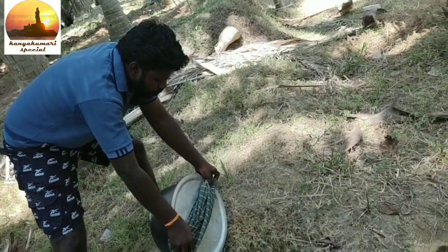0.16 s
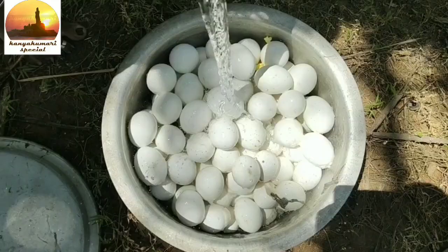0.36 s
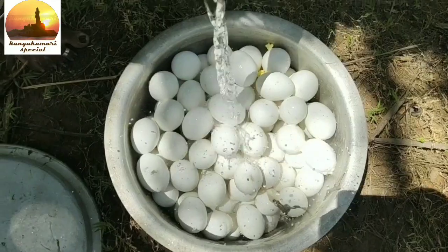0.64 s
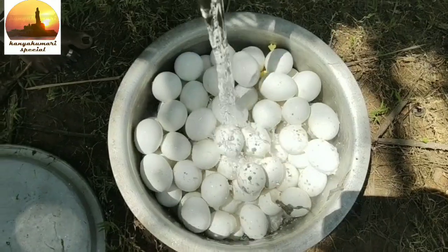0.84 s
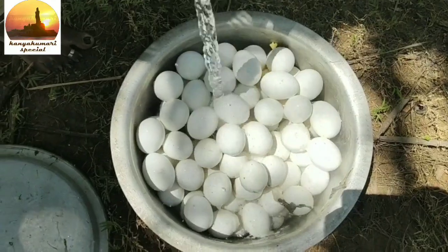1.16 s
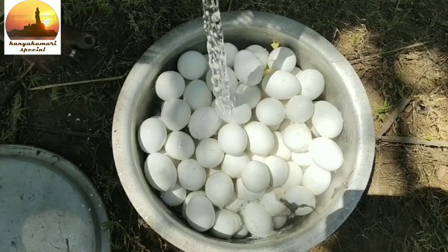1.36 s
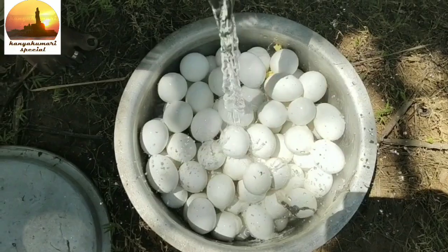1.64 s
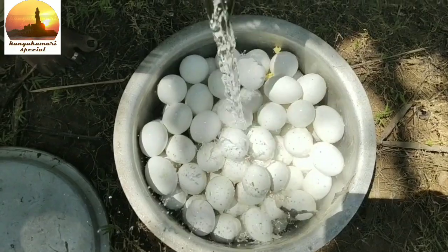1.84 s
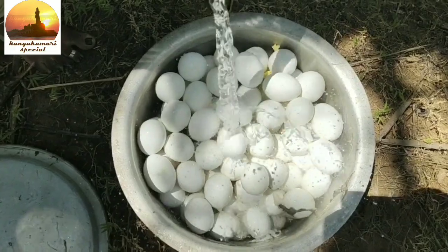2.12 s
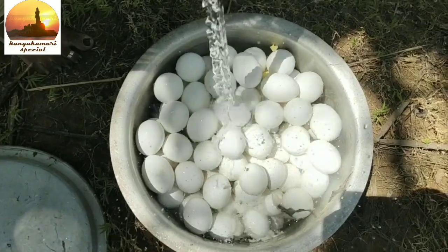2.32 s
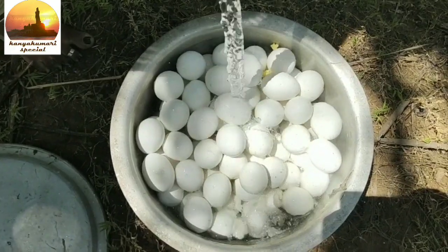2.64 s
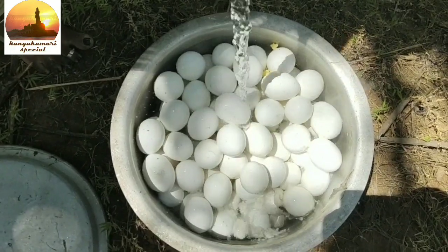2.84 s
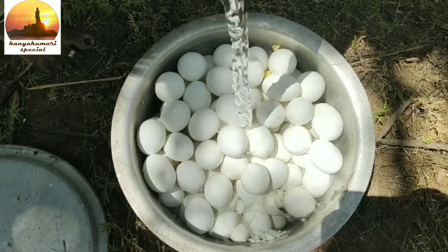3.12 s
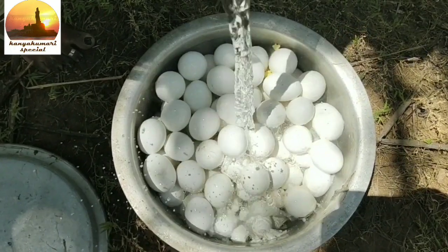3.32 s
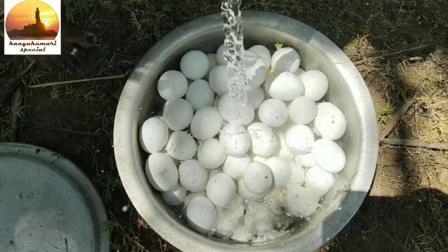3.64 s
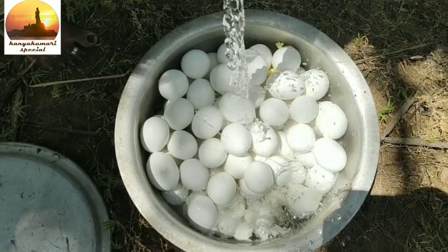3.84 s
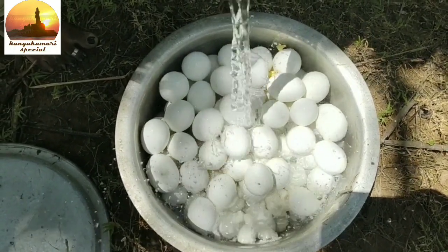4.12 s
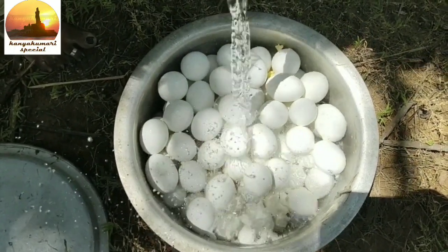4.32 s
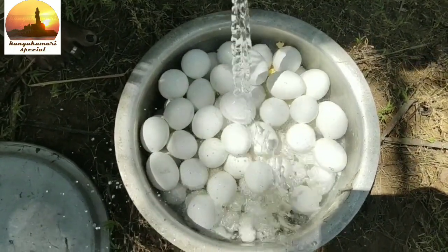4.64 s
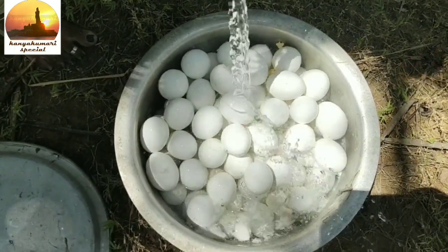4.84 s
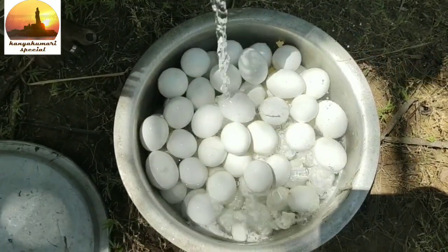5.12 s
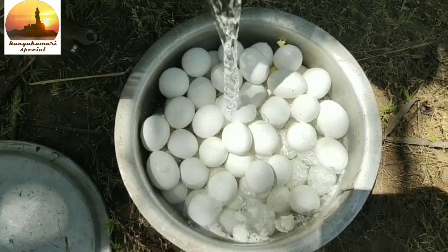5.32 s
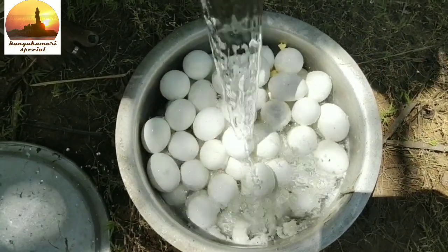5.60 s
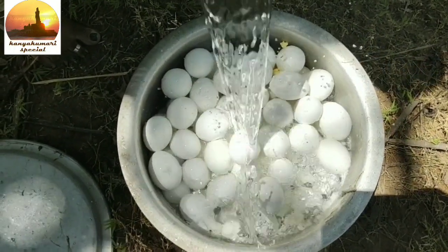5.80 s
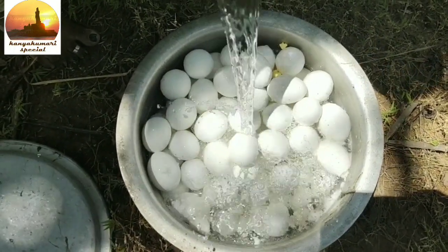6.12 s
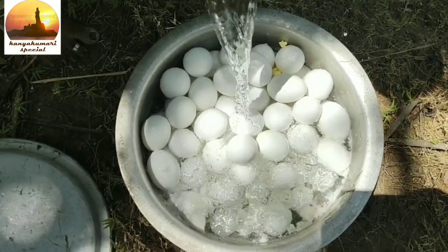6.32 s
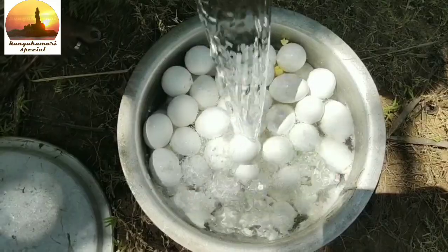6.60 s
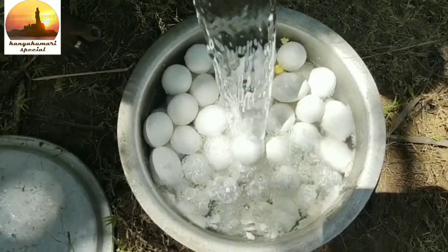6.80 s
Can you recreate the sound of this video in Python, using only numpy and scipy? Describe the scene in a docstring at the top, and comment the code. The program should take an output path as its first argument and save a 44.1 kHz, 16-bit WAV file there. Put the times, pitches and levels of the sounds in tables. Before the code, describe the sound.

Close and outdoors, water falls continuously onto eggshells in a metal pot. It starts suddenly after a moment of silence, bright and spattering with bubbly plops and a low metallic hum. Narrow gaps between eggs ring with gliding tones, and a faint low putter swells past the middle. Gulps and heaving slosh follow as the pool rises. A brief silent break precedes softer, deeper pouring. The stereo image is wide, with very little reverberation.

```python
"""The sound cuts in on water poured onto boiled eggs in a wide metal pot, outdoors and close by.
At once drops spatter on the shells, bubbles fizz, air pockets gurgle and the pot's base drums low.
Loud bubbles, ticks and gulps stand out; then narrow gaps ring, and a low putter swells midway.
As the pot fills, its air resonates and the pool heaves. Near the end the sound drops out once briefly,
then slugs of water thud. Noise through resonators and crowds of decaying sine bubbles make the water."""
import sys
import numpy as np
from scipy import signal
from scipy.io import wavfile
from scipy.ndimage import uniform_filter1d

SR = 44100
rng = np.random.default_rng(int(sys.argv[2]) if len(sys.argv) > 2 else 0)


def wav_out(sig):
    """Save sig, one row per channel (or a flat mono array), as 16-bit PCM at SR to the path in sys.argv[1]."""
    wavfile.write(sys.argv[1], SR, np.round(np.clip(np.atleast_2d(sig).T, -1, 1) * 32767).astype(np.int16))


N = 306936
TIME = np.arange(N) / SR


def gain_of(db):
    """Decibel law: level to amplitude ratio."""
    return 10 ** (np.asarray(db) / 20)


def follow(curve, column=1):
    """Linear interpolation: one column of a control curve, at every sample."""
    rows = np.array(curve)
    return np.interp(TIME, rows[:, 0], rows[:, column])


def wander(rate_hz, count=8):
    """Random modulation: sines of chance phase, slower than rate_hz, sum to an expected RMS of one."""
    t = np.linspace(0, N / SR, 400)
    speed, phase = rng.random((2, count, 1))
    sines = np.sin(2 * np.pi * (rate_hz * speed * t + phase))
    return np.interp(TIME, t, sines.sum(0) * np.sqrt(2 / count))


def steady(x, size=3500):
    """Level normalisation: division by the running RMS of both channels leaves only the grain."""
    power = uniform_filter1d(uniform_filter1d((x ** 2).mean(0), size), size)
    return x / np.sqrt(abs(power) + 1e-12)


def tilt(db):
    """Level difference between ears: gains of left and right when the right is db louder."""
    return gain_of(np.outer([-.5, .5], db))


def colour(x, points, column=1, size=4096):
    """Minimum-phase filtering: the given spectrum, with all ringing after each click."""
    rows = np.array(points)
    hz = abs(np.fft.fftfreq(size, 1 / SR))
    level_db = np.interp(np.log(hz + 1), np.log(rows[:, 0]), rows[:, column])
    log_gain = np.log(gain_of(level_db))
    # the Hilbert transform of the log gain supplies the minimum phase
    taps = np.fft.ifft(np.exp(np.conj(signal.hilbert(log_gain)))).real[:size // 2]
    return signal.oaconvolve(x, taps.reshape((1,) * (x.ndim - 1) + (-1,)), axes=-1)[..., :N]


def resonate(x, hz, width_hz):
    """Resonance by heterodyne: shift hz (fixed or moving) to zero, smooth twice, shift back; peak gain one."""
    turn = np.exp(2j * np.pi * np.cumsum(hz * np.ones(x.shape[-1])) / SR)
    r = np.exp(-np.pi * width_hz / SR)
    slow = signal.lfilter([(1 - r) ** 2], [1, -2 * r, r * r], x * turn.conj() + 1e-18)
    return 2 * (turn * slow).real


def around(x, hz, half_width_hz, order=4):
    """Band-pass by heterodyne: a steep-sided band that follows a moving pitch."""
    turn = np.exp(2j * np.pi * np.cumsum(hz) / SR)
    lowpass = signal.butter(order, half_width_hz, fs=SR, output="sos")
    slow = signal.sosfilt(lowpass, x * turn.conj() + 1e-18)
    return 2 * (turn * slow).real


def focus(crowd, pitch_hz, share, width_hz):
    """Cavity resonance: down between the eggs a share of the crowd rings at the cavity's pitch."""
    enclosed = np.clip(share, 0, 1)
    cavity = steady(resonate(crowd, pitch_hz, width_hz))
    return steady((1 - enclosed) * steady(crowd) + enclosed * cavity)


def drops(per_s, spread_db, wash, size=5):
    """Random impacts: clicks of very unequal size over noise, most a few samples later at left."""
    strength = gain_of(spread_db * np.minimum(rng.exponential(1, N), 3.8)) * rng.choice([-1, 1], N)
    clicks = strength * (rng.random(N) < per_s / SR)
    arrival = (np.arange(N) + rng.integers(-1, size, N)) % N
    pair = np.array([np.bincount(arrival, clicks, N), clicks])
    return pair / pair.std() + wash * rng.standard_normal((2, N))


def bubbles(s, height, hz, cycles, lag, size):
    """Bubble oscillation: each swells and dies, its pitch rising slightly as it nears the surface."""
    place = ((s * SR).astype(int)[:, None] + np.arange(size)).ravel()
    t = np.arange(size) / SR
    out = []
    for delay in (lag, 0 * lag):  # left, then right
        turns = np.maximum(t - delay[:, None], 0) * hz[:, None]
        age = turns / cycles[:, None]  # one at the loudest moment
        envelope = (age * np.exp(1 - age)) ** 3
        ring = envelope * np.sin(2 * np.pi * turns * (1 + 0.018 * (age - 2)))
        out.append(np.bincount(place, (height[:, None] * ring).ravel(), N)[:N])
    return np.array(out)


def swarm(pitch_hz, scatter, cycles, spread_db, lag_s, count, size):
    """Superposition: a crowd of bubbles of random level around the pitch of the moment."""
    when, big, ring, place, sign = rng.random((5, count))
    s = when * N / SR
    hz = np.interp(s, TIME, pitch_hz) * np.exp(scatter * rng.standard_normal(count))
    height = gain_of(spread_db * np.minimum(-np.log(1 - big), 4.5)) * np.sign(sign - .5)
    return bubbles(s, height, hz, cycles * (.5 + ring), lag_s * place, size)


def plops(rows, cycles, size):
    """Bubble oscillation in common mode: big, short bubbles, alike in both channels."""
    s, db, hz = np.transpose(rows)
    return bubbles(s, gain_of(db), hz, np.full(len(s), cycles), 0 * s, size)


def swell(start, length):
    """Envelope: a short linear rise, a hold and an exponential fade."""
    rise_s, fade_s = 0.0087, 0.02
    near = (TIME > start - .1) & (TIME < start + length + .3)
    t = TIME[near] - start
    out = np.zeros(N)
    out[near] = np.clip(t / rise_s + 1, 0, 1) * np.exp(-np.maximum(t - length, 0) / fade_s)
    return out


def swells(rows, rest_db, rest_hz):
    """Power addition: level and pitch of a steady sound whose swells each pull the pitch to their own."""
    power = gain_of(2 * rest_db) * np.ones(N)
    pull = power * rest_hz
    for start, length, db, hz in rows:
        extra = (gain_of(db) * swell(start, length)) ** 2
        power, pull = power + extra, pull + extra * hz
    return np.sqrt(power), pull / power


# force of the stream on the shells: [t/s, spatter level/dB]
STREAM_FORCE = [(0.32, -43), (0.44, -35), (0.85, -34), (0.97, -39.5), (1.07, -35.5), (1.55, -34),
                (1.68, -31), (1.85, -33.5), (1.96, -30), (2.15, -34), (2.42, -42.5), (2.52, -42),
                (2.66, -36), (3.26, -34), (3.46, -41), (3.6, -34), (3.84, -38), (4.15, -38), (4.4, -43),
                (4.68, -43), (4.74, -46.5), (4.78, -38), (4.82, -54), (4.86, -44.5), (4.95, -40.5),
                (5.08, -45.5), (5.38, -34.5), (5.6, -35.5), (5.75, -44), (6.0, -39.5), (6.22, -41),
                (6.46, -39.5), (6.6, -50.5), (6.95, -48.5)]


def force_db():
    """Relative level: how much harder than usual (-36 dB) the stream lands."""
    return follow(STREAM_FORCE) + 36


def chinks(hits, low_hz=4400, high_hz=8400, width_hz=380, count=8):
    """Cavity resonance: chinks between shells ring with the drops; each comes and goes as water covers it."""
    rings = 0
    for hz in np.geomspace(low_hz, high_hz, count):
        open_db = 16.0 * np.clip(wander(rate_hz=8), -2, 1)
        moving_hz = hz * (1 + 0.0091 * wander(rate_hz=12))
        rings = rings + resonate(hits, moving_hz, width_hz) * gain_of(open_db)
    return steady(rings) * tilt(12.0)


# the stream's landing place: [t/s, depth from 0 on bare shells to 1 down between the eggs]
LANDING_DEPTH = [(2.1, 0.25), (2.4, 0.44), (2.65, 0.79), (3.0, 0.44), (3.3, 0.53), (4.2, 0.7), (4.5, 0.66),
                 (5.1, 0.36), (5.8, 0.79), (6.45, 0.72)]
# water standing in the pot: [t/s, extent from 0 hidden under the eggs to 1 an open pool]
POOL_EXTENT = [(2.2, 0.038), (4.3, 0.092), (4.8, 0.44), (5.3, 0.92), (6.9, 0.83)]
# spectrum of the spatter at each microphone port: [f/Hz, left level/dB, right level/dB]
SPATTER_SPECTRUM = [(149, -28, -24), (356, -11.5, -4), (1240, -24.5, -8.5), (2210, -41, 0), (3330, -0.5, 6),
                    (4230, -2.5, 4), (4500, 0, 0.5), (6850, -8.5, 7), (7370, -14.5, 5.5), (8030, 2.5, -3),
                    (9200, -11, -10.5), (10800, -39.5, -9), (15900, -53, -36.5)]
# spectrum of the slap on bare shells: [f/Hz, level/dB]
SLAP_SPECTRUM = [(100, -9.5), (250, -15), (450, -12), (950, 11), (1400, 0), (2100, 12.5), (2700, 15.5),
                 (4000, -27), (9000, -47)]
# slap on bare shells against the spatter: [t/s, relative level/dB]
SLAP_LEVEL = [(0.4, -5.5), (1.7, -4), (2.0, -8), (2.2, 2), (2.45, -11), (2.95, -3.5), (3.15, -8),
              (3.4, -13), (3.65, -7), (4.1, -5), (4.5, 6), (5.0, -20), (5.8, -25), (6.1, -14)]
# whistle of the finest bubbles: [t/s, level relative to the spatter/dB, f/Hz]
BEAD_WHISTLE = [(0.4, -1.5, 7180), (2.1, -1, 7090), (2.45, -3.5, 7030), (2.75, -5.5, 7430), (3.05, 1, 6780),
                (3.4, -3, 6660), (3.6, -1, 7100), (4.2, 2, 6950), (4.6, -1, 7130), (5.05, -3.5, 7160),
                (5.35, -1.5, 6650), (5.62, -5.5, 6400), (5.8, -5.5, 7300), (6.2, -9, 6700),
                (6.9, -1.5, 7030)]
# spectrum of the mist: [f/Hz, level/dB]
MIST_SPECTRUM = [(4000, -61), (8000, 5), (10500, 5.5), (13000, 2.5), (16000, -1)]


def spatter():
    """Impact noise: hard drops on the shells, their slap, a mist, and a whistle of the finest bubbles."""
    hits, sunk = drops(per_s=1700, spread_db=4.0, wash=0.5), follow(LANDING_DEPTH)
    left = colour(hits[0], SPATTER_SPECTRUM, column=1)
    right = colour(hits[1], SPATTER_SPECTRUM, column=2)
    body = steady(np.array([left, right]))
    slap = steady(colour(hits, SLAP_SPECTRUM)) * gain_of(follow(SLAP_LEVEL)) * tilt(1.3)
    bead_hz = follow(BEAD_WHISTLE, column=2) + 130 * wander(rate_hz=5.5)
    beads = swarm(bead_hz, scatter=0.087, cycles=3.84, spread_db=4.0, lag_s=0.00026, count=6000, size=224)
    beads = focus(beads, bead_hz, share=0.34 + 0.091 * sunk, width_hz=800)
    beads = beads * gain_of(follow(BEAD_WHISTLE)) * tilt(12.0)
    haze = hits + 1.0 * rng.standard_normal((2, N))
    mist_db = -5.0 - 4.5 * follow(POOL_EXTENT) + 2.04 * wander(rate_hz=4.5)
    mist = steady(colour(haze, MIST_SPECTRUM)) * gain_of(mist_db) * tilt(2.9)
    shells = gain_of(6.5 - 7.4 * sunk) * body + gain_of(0.5) * sunk ** 2 * chinks(hits)
    flicker_db = (1.86 + follow(POOL_EXTENT)) * wander(rate_hz=17)
    return (shells + slap + beads + mist) * gain_of(follow(STREAM_FORCE) + flicker_db)


# flurries of bubbles, when the stream drags air under: [start t/s, length t/s, level/dB, f/Hz]
BUBBLE_FLURRIES = [(0.424, 0.15, -38.5, 3600), (0.567, 0.092, -28.5, 3290), (0.56, .06, -38.5, 2240),
                   (0.746, 0.098, -32, 3450), (1.352, 0.15, -33.5, 3320), (1.924, 0.28, -33, 3430),
                   (2.048, 0.15, -35, 2850), (2.22, 0.011, -29, 3600), (2.26, 0.068, -31, 3700),
                   (2.333, 0.1, -39, 3750), (2.714, 0.089, -36.5, 3580), (2.798, 0.27, -42.5, 2400),
                   (3.174, 0.3, -34, 3420), (3.523, 0.29, -32.5, 3310), (3.826, 0.12, -36, 3560),
                   (3.965, 0.082, -36, 3100), (4.142, 0.086, -38, 3790), (4.35, 0.26, -36.5, 3160),
                   (4.446, 0.17, -43, 2010), (4.636, 0.069, -42.5, 2990), (4.996, 0.29, -42.5, 2400),
                   (5.269, 0.095, -31, 3880), (5.368, 0.17, -38.5, 4180), (5.52, 0.14, -39.5, 2150),
                   (5.583, 0.1, -38, 3830), (5.75, .02, -34.5, 3180), (5.793, 0.065, -34.5, 3100),
                   (5.968, 0.014, -36, 1950), (5.904, 0.1, -37, 3340), (6.041, 0.13, -35, 3760),
                   (6.138, 0.39, -38.5, 2240), (6.201, 0.054, -32, 3780), (6.43, 0.2, -41.5, 4000),
                   (6.59, 0.066, -35.5, 2320), (6.669, 0.023, -27.5, 2500), (6.704, .13, -33.5, 2220)]
DEEP_BELOW_HZ = 2700  # flurries below this pitch sink deep and ring the pot's air


def fizz():
    """Air entrainment: small bubbles pinched off by the plunging stream, more with its force and in flurries."""
    small = [row for row in BUBBLE_FLURRIES if row[3] >= DEEP_BELOW_HZ]
    rest_db = -42 + 0.78 * force_db() + 2 * follow(POOL_EXTENT)
    level, hz = swells(small, rest_db, rest_hz=3530)
    hz = hz + 50 * wander(rate_hz=9)
    crowd = swarm(hz, scatter=0.11, cycles=3.56, spread_db=3.0, lag_s=.0001, count=5600, size=320)
    crowd = around(crowd, hz, half_width_hz=920)
    crowd = focus(crowd, hz, share=0.73 * follow(LANDING_DEPTH), width_hz=1100)
    return crowd * level * gain_of(0.97 + 1.8 * wander(rate_hz=22)) * tilt(7.3)


# echoes from the eggs and the pot's wall: [delay t/s, gain/1]
NEAR_ECHOES = [(.00062, 0.57), (.00105, -0.69), (.0015, 0.47), (.0021, -0.53), (.0031, .25),
               (.00385, 0.063)]


def in_pot(x, depth=0.9, drift_s=0.00012, oversampling=4):
    """Comb filtering: near echoes band the splash, and the bands drift as the stream wanders."""
    fine = signal.resample_poly(x, oversampling, 1, axis=1)
    sunk, out = depth * follow(LANDING_DEPTH) ** 2, x.copy()
    for delay, gain in NEAR_ECHOES:
        for port in range(2):
            at = (TIME - delay - drift_s * wander(rate_hz=.7)) * SR * oversampling
            out[port] += gain * sunk * fine[port, np.clip(at, 0, N * oversampling - 1).astype(int)]
    return out / np.sqrt(1 + sunk ** 2 * sum(gain ** 2 for _, gain in NEAR_ECHOES))


# edges of the band lost between the eggs: [lower f/Hz, upper f/Hz]
LOST_BAND = (1420, 2450)


def muffled(x, depth=0.6):
    """Band rejection: down between the eggs the splash loses its middle, until the pool opens."""
    band = signal.butter(2, LOST_BAND, "bandpass", fs=SR, output="sos")
    middle = signal.sosfiltfilt(band, x)
    return x - np.clip(depth * follow(LANDING_DEPTH) * (1 - follow(POOL_EXTENT)), 0, 1) * middle


def surge_db():
    """Periodic sloshing: the pool heaves under the stream, more deeply as it opens."""
    crest_s, period_s, depth_db = 5.13, 0.265, 2.5
    return depth_db * follow(POOL_EXTENT) * np.cos(2 * np.pi * (TIME - crest_s) / period_s)


# air pocket dug by the stream between the eggs: [t/s, level/dB, f/Hz, enclosed share from 0 to 1]
AIR_POCKET = [(0.32, -47, 650, 0), (0.42, -35.5, 725, 0.1), (0.84, -46, 737, 0.15), (0.99, -36, 785, 0.2),
              (1.09, -38, 716, .1), (1.17, -50, 815, 0.1), (1.26, -37, 864, 0.04), (1.72, -34, 749, 0.13),
              (2.05, -45.5, 818, 0.52), (2.42, -38.5, 874, 0.63), (2.69, -38, 804, 0.12),
              (3.12, -37.5, 1030, 0.4), (3.3, -57, 926, 0.8), (3.46, -60, 920, 0.2), (3.56, -44, 960, 0.7),
              (3.8, -38.5, 987, 0.74), (4.12, -34.5, 925, 0.68), (4.6, -37.5, 1003, 0.26),
              (4.74, -54, 980, .5), (4.89, -66, 890, 0), (4.93, -38.5, 850, 0.1), (5.03, -33, 788, 0.33),
              (5.13, -34.5, 766, 0.2), (5.24, -37, 820, 0.33), (5.4, -34, 712, 0.28),
              (5.65, -37, 662, 0.41), (6.25, -44.5, 571, 0.2), (6.46, -44, 624, 0.33),
              (6.52, -52, 610, 0.5), (6.6, -68, 630, 0.7), (6.95, -54, 662, 0.8)]
# spectrum of the slosh: [f/Hz, level/dB]
SLOSH_SPECTRUM = [(120, -9.5), (250, -9.5), (370, -17), (500, -1.5), (640, 0), (850, -11.5), (1500, -9.5),
                  (4000, -82)]


def gurgle():
    """Cavity collapse: large air pockets between the eggs, over a slosh that grows with the stream."""
    hz = follow(AIR_POCKET, column=2) * (1 + 0.019 * wander(rate_hz=9))
    enclosed = follow(AIR_POCKET, column=3)
    crowd = swarm(hz, scatter=0.2515, cycles=2.75, spread_db=0.1, lag_s=0.0001, count=3000, size=640)
    crowd = around(crowd, hz, half_width_hz=306)
    crowd = signal.sosfilt(signal.butter(6, 490, "highpass", fs=SR, output="sos"), crowd)
    bubbling_db = 1.4 * (1 - enclosed) * wander(rate_hz=14)  # an enclosed pocket gurgles more evenly
    pockets = focus(crowd, hz, share=0.97 * enclosed, width_hz=174)
    pockets = pockets * gain_of(follow(AIR_POCKET) - 1.5) * tilt(0.82)
    slosh = steady(colour(drops(per_s=900, spread_db=4.5, wash=0.13), SLOSH_SPECTRUM))
    widening_db = np.interp(TIME, [5.4, 5.95], [0, 5.5])  # the stream widens
    slosh_db = -49.5 + 0.62 * force_db() + widening_db + 0.6 * surge_db()
    return (pockets + slosh * gain_of(slosh_db) * tilt(1.4)) * gain_of(surge_db() + bubbling_db)


# air resonances of the full pot: [f/Hz, width f/Hz, level/dB]
POT_AIR_MODES = [(1536, 130, -5), (2035, 290, 8), (2487, 430, 4.5)]
# shifting tuning of the pot's air: [t/s, pitch relative to the full pot/1]
AIR_TUNING = [(4.6, 0.9), (5.05, 1.02), (5.5, 1.04), (5.9, 0.94), (6.45, 1.03), (6.65, 1.02)]


def hollow():
    """Air-column resonance: deep bubbles ring the pot's air, louder as the pool grows, around a lower rest pitch."""
    deep = [row for row in BUBBLE_FLURRIES if row[3] < DEEP_BELOW_HZ]
    pool = follow(POOL_EXTENT)
    rest_db = -54.5 + 15 * pool + 0.58 * force_db()
    level, hz = swells(deep, rest_db, rest_hz=2550 - 450 * pool)
    crowd = swarm(hz, scatter=0.092, cycles=2.5, spread_db=2.0, lag_s=0.00016, count=5000, size=384)
    air = 0
    for mode_hz, width_hz, db in POT_AIR_MODES:
        air = air + gain_of(db) * resonate(crowd, mode_hz * follow(AIR_TUNING), width_hz)
    return steady(0.76 * crowd + pool * air) * level * gain_of(1.0 * wander(rate_hz=14)) * tilt(0.53)


# spectrum of the rumble: [f/Hz, level/dB]
RUMBLE_SPECTRUM = [(15, -10), (35, -34), (60, -6), (80, 0), (110, 1), (135, -3), (180, -10.5), (300, -22),
                   (700, -38)]
# low rumble: [t/s, level/dB]
RUMBLE_LEVEL = [(0.32, -47.5), (0.6, -42), (1.62, -46.5), (1.9, -59), (3.6, -60.5), (4.0, -56.5),
                (5.2, -58), (6.05, -58), (6.45, -46.5), (6.95, -48.5)]
# hum of the pot's base, until water covers it: [t/s, level/dB]
HUM_LEVEL = [(0.32, -50), (0.5, -44), (1.2, -40), (1.68, -45), (1.9, -58.5), (2.48, -56), (2.65, -69.5)]
# upper drone of the pot: [t/s, level/dB]
DRONE_LEVEL = [(0.32, -58), (1.6, -48.5), (1.9, -54), (2.9, -65.5), (6.9, -57.5)]


def drumming():
    """Forced vibration: the stream's weight drums a rumble, a wavering hum and a drone from the pot's base."""
    def push(apart):
        """Partial coherence: noise shared by both channels, plus a part of their own."""
        return rng.standard_normal(N) + apart * rng.standard_normal((2, N))
    rumble = steady(colour(push(0.85), RUMBLE_SPECTRUM), size=9000) * gain_of(follow(RUMBLE_LEVEL) + 3.0)
    hum_hz = np.interp(TIME, [.4, 2.4], [151.5, 156]) + 0.9 * wander(rate_hz=5.4)
    hum = np.sqrt(2) * np.sin(2 * np.pi * np.cumsum(hum_hz) / SR)
    hum = hum * gain_of(follow(HUM_LEVEL) + 0.95 * wander(rate_hz=9.6))
    knocks = push(0.25)
    drone = resonate(knocks, 192, width_hz=28) + gain_of(-10.0) * resonate(knocks, 276.0, width_hz=65)
    return rumble + hum + steady(drone) * gain_of(follow(DRONE_LEVEL) - 3.0)


# single loud bubbles: [t/s, level/dB, f/Hz, left minus right level/dB]
LOUD_BUBBLES = [(0.432, -20, 4400, -13), (0.4445, -13, 7030, -7), (0.4839, -16, 6890, -11),
                (0.5712, -9, 3320, -4.5), (0.5874, -12.5, 2730, -5.5), (0.6341, -13.5, 3250, -3),
                (0.7533, -14.5, 3480, -6.5), (0.7812, -18, 7400, -6.5), (0.8022, -26, 3000, -7.5),
                (0.8202, -7, 3010, -8), (0.8344, -17, 3130, -9), (0.8516, -10.5, 7420, -15),
                (0.8715, -12, 3460, -15), (0.8784, -13, 3300, -6.5), (1.0846, -13.5, 8000, -4),
                (1.1513, -19, 7600, -6.0), (1.4168, -15, 4000, -4), (1.6458, -16, 7440, -12),
                (1.6584, -11, 7000, -17), (1.6744, -17, 6850, -8), (1.7012, -12.5, 7450, -8.0),
                (1.8279, -14.5, 7300, -7.5), (1.9511, -11.5, 6500, -15.5), (1.9606, -12, 3500, -8.0),
                (1.9804, -14, 3780, -7), (1.9874, -10.5, 3670, -6), (2.0768, -13.5, 7100, -14),
                (2.1412, -22, 3720, -6.0), (2.219, -7.5, 3480, -7), (2.2254, -12, 3400, -9.0),
                (2.6484, -15.5, 6440, -12), (2.7293, -17, 3760, -6), (3.0959, -13, 6600, -12),
                (3.1238, -19, 7110, -18), (3.1708, -17, 3650, -6.5), (3.2017, -13, 3580, -5),
                (3.261, -13, 7080, -14), (3.4551, -16, 3340, -3), (3.498, -16.5, 3180, -7.5),
                (3.5419, -11.5, 3220, -6.5), (3.5713, -15, 3320, -8.5), (3.6332, -15, 3370, -8.0),
                (3.6417, -11, 3450, -9.0), (3.6474, -12.5, 3330, -6.0), (3.9669, -15, 3160, -9.0),
                (4.0727, -15.5, 7000, -19), (4.3556, -16.5, 3200, -3), (4.4788, -18, 3330, -7.0),
                (4.6693, -20, 3100, -2), (4.7691, -27, 2970, -6), (5.2929, -13.5, 3810, -7.0),
                (5.3862, -11.5, 6640, -19), (5.6211, -19, 2130, 0), (5.7629, -18, 3320, -8.0),
                (5.8162, -17, 3000, -12), (6.2462, -17, 3750, -4), (6.6623, -34, 2580, -7),
                (6.7471, -20, 2070, -1.0), (6.8394, -20.5, 2050, 5), (6.8504, -30, 5920, -9),
                (6.8698, -22, 4040, -9)]


def plips():
    """Bubble oscillation: the few that stand out of the crowd, each from its own side."""
    s, db, hz, pan_db = np.transpose(LOUD_BUBBLES)
    cycles, sides = np.clip(hz * 0.0011, 1.2, 5), tilt(-pan_db)
    heights = gain_of(db) * sides / sides.mean(0)
    return np.array([bubbles(s, height, hz, cycles, 0 * s, size=512)[0] for height in heights])


# sharp drops striking shells and rim: [t/s, relative level/dB]
SHARP_DROPS = [(0.4455, -2), (0.572, -5), (0.7822, -3), (0.8525, -4), (0.898, -1.5), (1.21, -17),
               (1.418, 2), (1.72, -17), (1.952, 1), (2.22, -14), (2.5272, -11), (2.73, -2), (3.263, 0),
               (3.5912, -14), (4.074, -21), (4.115, -5), (4.357, -13), (4.77, -12), (5.3867, -10)]


def ticks():
    """Impulse excitation: stray drops snap on the shells and the rim as very short noise bursts."""
    clicks = np.zeros(N)
    for s, db in SHARP_DROPS:
        clicks[round(s * SR)] = gain_of(db - 6.0)
    t = np.arange(384) / SR
    snap = rng.standard_normal((2, len(t))) * np.exp(-t / 0.00045)
    snaps = signal.oaconvolve(clicks[None], snap, axes=1)[:, :N]
    return 0.2 * colour(snaps, MIST_SPECTRUM) + 0.8 * colour(snaps, SPATTER_SPECTRUM, column=2) * tilt(6.4)


# large pockets of air bursting: [t/s, level/dB, f/Hz]
BURSTING_POCKETS = [(1.101, -29, 590), (1.516, -24, 762), (1.631, -22, 766), (2.445, -23.5, 870),
                    (2.536, -29, 785), (3.135, -23.5, 990), (3.876, -26, 960), (4.196, -39, 904),
                    (4.272, -23, 912), (4.925, -17.5, 830), (5.067, -36, 835), (5.119, -17, 790),
                    (5.384, -22.5, 676), (5.424, -30, 697), (5.468, -38, 740), (5.538, -26, 644),
                    (5.643, -28, 638), (5.663, -33, 646), (5.68, -27, 665), (5.908, -26, 624)]


def gulps():
    """Large-bubble oscillation: bursting air pockets ring low and briefly."""
    return plops(BURSTING_POCKETS, cycles=1.9, size=1024)


# water running through narrow gaps: [start t/s, length t/s, level/dB, first f/Hz, last f/Hz]
NARROW_GAPS = [(2.162, 1.03, -41.5, 1220, 1200), (2.298, 0.32, -49, 1810, 1830),
               (2.31, 0.47, -46, 2770, 2800), (2.52, 0.65, -46.5, 1470, 1440),
               (3.15, 0.45, -50, 2800, 2730), (3.257, 1.25, -43.5, 1265, 1255),
               (3.308, 0.31, -48.5, 1640, 1600), (3.843, 0.13, -46.5, 1650, 1670),
               (4.26, .38, -41, 2740, 2760), (4.32, 0.25, -45.5, 1640, 1710),
               (4.337, 0.31, -47, 4640, 4450), (4.656, 0.09, -40, 3100, 3010),
               (4.91, 0.05, -42, 1150, 1060), (4.95, 0.34, -41, 940, 893), (4.972, 0.25, -40, 3200, 3320),
               (5.26, 0.31, -45.5, 1560, 1540), (5.95, 0.031, -45, 1200, 1240),
               (6.1, 0.38, -45.5, 1590, 1540), (6.013, 0.21, -41, 3420, 3770),
               (6.435, 0.025, -39.5, 2940, 2950), (6.779, 0.04, -43.5, 940, 920),
               (2.247, .1, -41, 4350, 4300), (2.5, 0.49, -45, 8420, 8600), (2.36, 0.28, -44, 3650, 3780),
               (2.556, 0.21, -36, 7300, 7140), (2.993, 0.47, -43.5, 4200, 4340),
               (3.0, 1.56, -52.5, 5200, 5300), (4.357, 0.1, -38.5, 4130, 4050),
               (4.893, 0.41, -46, 4520, 4560), (4.996, 0.29, -41, 2800, 2600),
               (5.208, 0.41, -47.5, 5560, 5720), (5.54, 0.51, -44.5, 2110, 1940),
               (6.658, .16, -44, 2130, 2010)]


def gaps():
    """Cavity resonance: running water rings the air in narrow gaps, each at its own gliding pitch."""
    trickle, out = drops(per_s=1200, spread_db=4.5, wash=0.46), np.zeros((2, N))
    for start, length, db, first_hz, last_hz in NARROW_GAPS:
        shape = swell(start, length)
        live = shape > .01
        hz = np.interp(TIME[live], [start, start + length], [first_hz, last_hz])
        width_hz = 104 + 0.043 * first_hz  # higher gaps resonate more broadly
        ring = steady(resonate(trickle[:, live], hz, width_hz))
        out[:, live] += ring * shape[live] * gain_of(db) * tilt(3.8 * np.log2(first_hz / 1000))
    return out * gain_of(2.8 * wander(rate_hz=6.2))


# levels of the putter: [t/s, thump level/dB, lower ring level/dB, upper ring level/dB]
PUTTER_LEVELS = [(3.6, -66, -67, -66), (4.03, -52.5, -63, -54.5), (4.3, -63, -58, -56),
                 (4.55, -58.5, -50.5, -58.5), (4.8, -46, -52, -55.5), (5.0, -51.5, -51.5, -60),
                 (5.3, -63.5, -67, -64.5), (5.6, -76, -77, -84)]
# what each beat rings, thump first: [f/Hz, width f/Hz]
PUTTER_MODES = [(93, 56), (190, 36), (250, 34)]


def putter():
    """Periodic excitation: near-even beats, perhaps a pump's engine, each a thump and two soft rings."""
    period_s, beat_s = 0.0567, 4.811
    count = np.floor((TIME - beat_s + 0.00088 * wander(rate_hz=6)) / period_s)
    beats = np.diff(count, prepend=count[0]) * gain_of(2.2 * wander(rate_hz=10))
    out = 0
    for column, (hz, width_hz) in enumerate(PUTTER_MODES, 1):
        ring = resonate(beats, hz, width_hz)
        out = out + ring / ring.std() * gain_of(follow(PUTTER_LEVELS, column))
    return out


# slugs of the wide stream landing in the pool: [t/s, level/dB, f/Hz]
WATER_SLUGS = [(6.435, -34, 95), (6.477, -34, 120), (6.505, -37, 85), (6.553, -35, 125), (6.597, -34, 108),
               (6.627, -39, 101), (6.738, -31.5, 104), (6.934, -36, 100)]


def thuds():
    """Low-frequency impact: slugs of the wide stream thud into the pool as short, deep pulses."""
    return plops(WATER_SLUGS, cycles=1.0, size=3000)


def walls(x, t60=0.06, size=3000):
    """Reverberation: quick scattered reflections from the eggs and the ground decay exponentially."""
    t = np.arange(size) / SR
    sparse = rng.standard_normal((2, size)) * (rng.random((2, size)) < .12)
    taps = sparse * gain_of(-60 * t / t60) * (t > .003)
    taps /= np.linalg.norm(taps, axis=1, keepdims=True)
    return signal.oaconvolve(x, taps, axes=1)[:, :N]


def scene():
    """Superposition: all the water sounds with their reflections, the pot beneath, and the putter."""
    side_db = np.interp(TIME, [4.0, 5.2], [.3, -1.8])  # the splash's balance shifts left as the pot fills
    splash = muffled(in_pot(spatter() + fizz())) * tilt(side_db)
    water = splash + gurgle() + hollow() + plips() + ticks() + gulps() + gaps()
    return gain_of(-0.7) * water + gain_of(-10.5) * walls(water) + drumming() + putter() + thuds()


# spans in which sound is heard: [on t/s, off t/s]
LIVE_SPANS = [(0.311, 6.286), (6.422, 7.0)]


def record(dry):
    """Gating and band limitation: sound only in the live spans, then a steep low-pass."""
    spans = sum(1. * ((TIME > on) & (TIME < off)) for on, off in LIVE_SPANS)
    live = uniform_filter1d(spans, size=100)
    lowpass = signal.firwin(401, 16100, window=("kaiser", 9), fs=SR)
    return signal.oaconvolve(dry * live, lowpass[None], "same")


dry = scene()
out = record(dry)
wav_out(out)
```